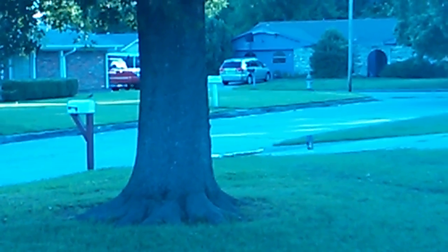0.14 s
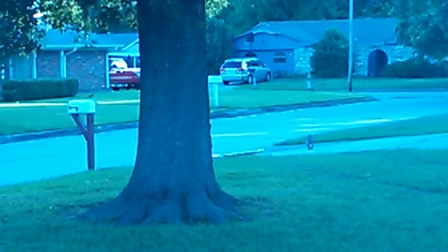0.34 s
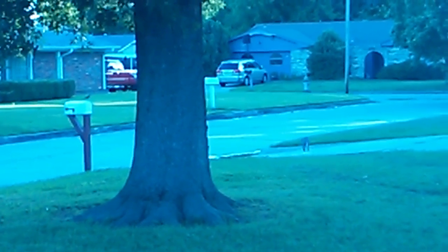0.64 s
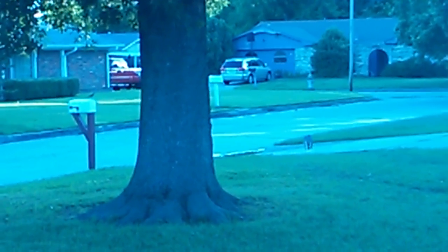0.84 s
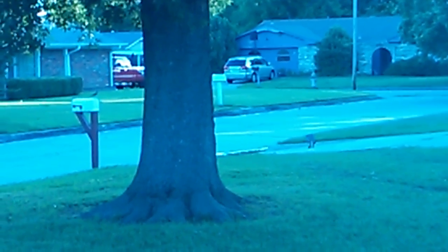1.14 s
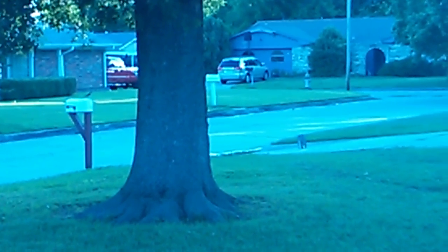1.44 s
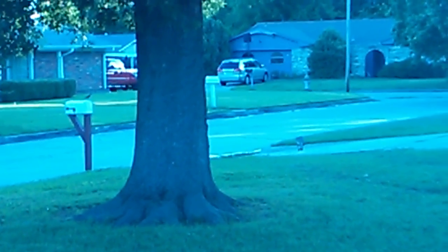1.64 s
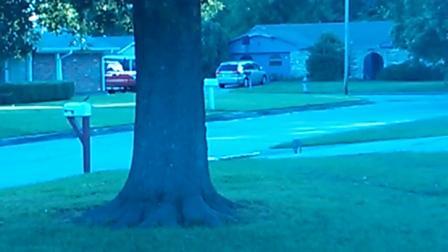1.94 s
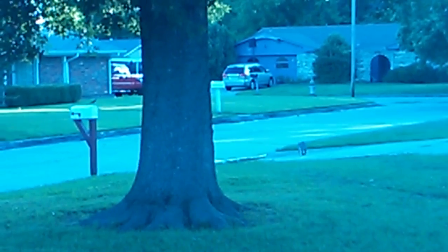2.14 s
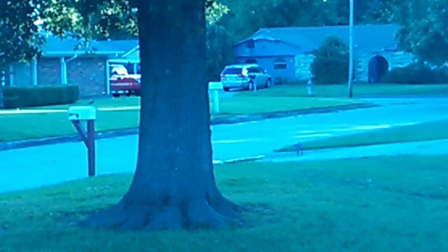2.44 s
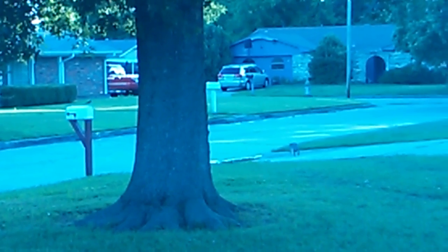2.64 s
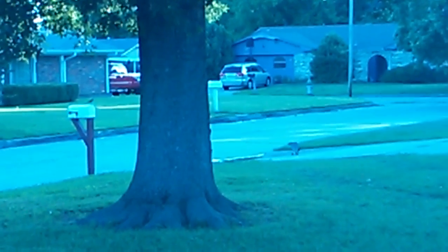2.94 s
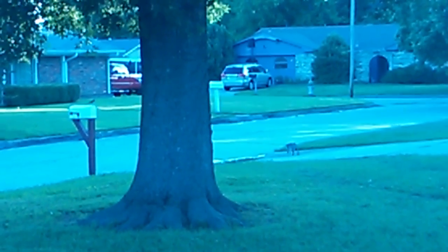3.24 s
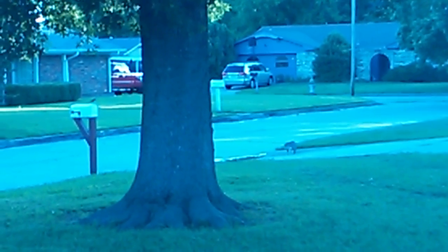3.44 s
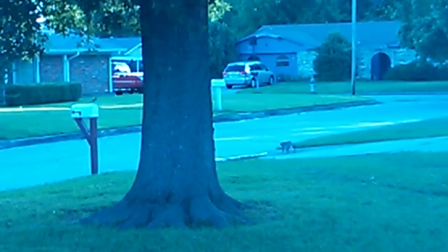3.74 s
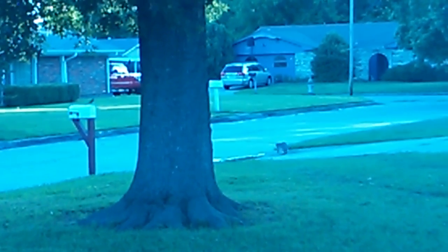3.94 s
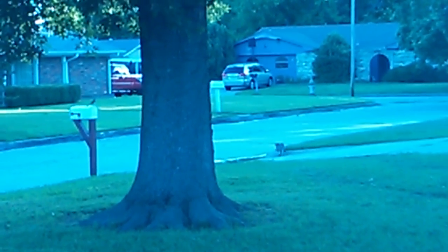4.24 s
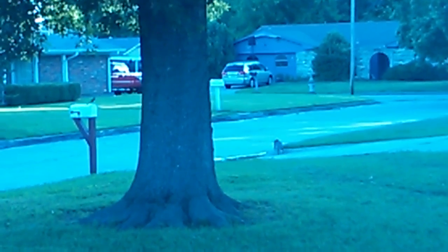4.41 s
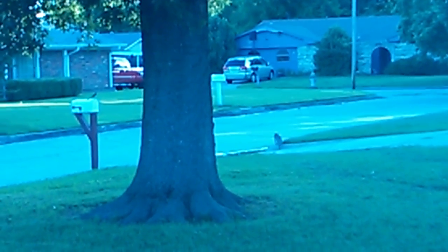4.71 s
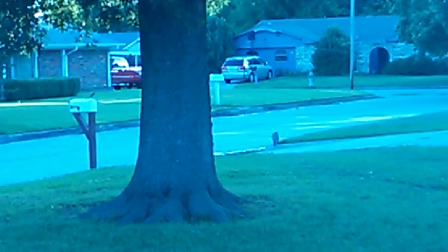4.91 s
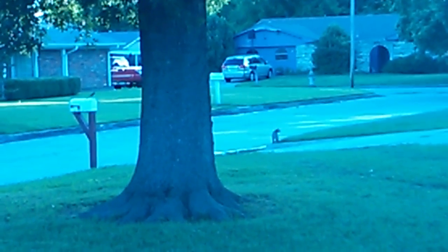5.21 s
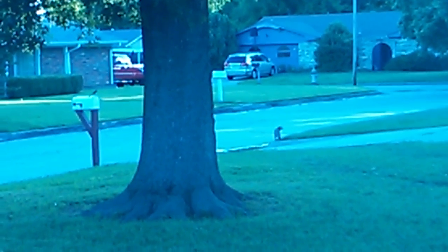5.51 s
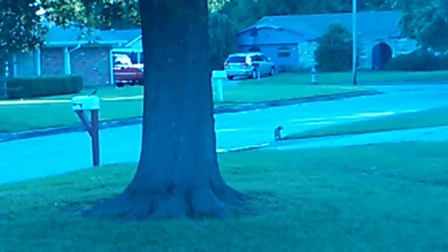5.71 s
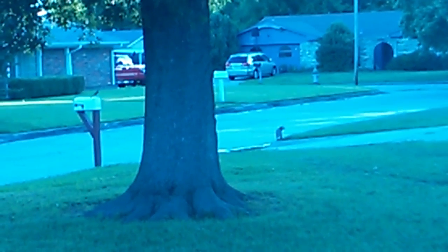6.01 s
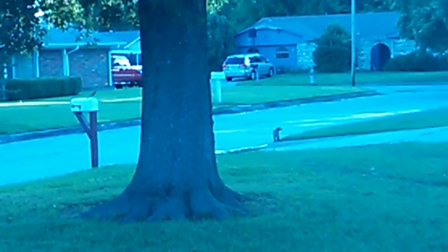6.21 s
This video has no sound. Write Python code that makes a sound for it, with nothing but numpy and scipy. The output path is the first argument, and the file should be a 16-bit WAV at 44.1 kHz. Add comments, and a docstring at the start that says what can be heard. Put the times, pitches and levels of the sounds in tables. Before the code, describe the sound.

On a quiet suburban street, a jay gives four short, harsh calls at uneven gaps, each echoing lightly off the houses. Faint chirps and whistles from farther birds fall between them. After the first call comes a brief dry clatter in the branches and two thin, high bird notes. Distant traffic, a low machine hum and faint insect hiss lie underneath, while soft puffs of air bump the microphone.

```python
"""A quiet suburban street opens on distant traffic, humming machines, insect hiss and faint bird whistles.
Just before 1 s a jay scolds from a tree: two rough voices in its throat fall together in a harsh "chak"
that comes back from the house fronts. Soft puffs of air bump the microphone on and off.
Near 2 s something clatters in the branches, and two thin, high bird calls sound.
The jay scolds three more times while the insects fade and a far bird repeats a low-high phrase."""
import sys
import numpy as np
from scipy import signal
from scipy.fft import rfft, irfft, next_fast_len
from scipy.io import wavfile
from scipy.ndimage import uniform_filter1d, map_coordinates

SR = 44100
rng = np.random.default_rng(int(sys.argv[2]) if len(sys.argv) > 2 else 0)


def to_wav(sig):
    """Store sig (one row per channel, or 1-D mono) as 16-bit WAV at the path in sys.argv[1].

    Samples outside -1..1 are clipped; the rate is SR.
    """
    pcm = np.clip(np.atleast_2d(sig), -1, 1) * 32767
    pcm = np.round(pcm).astype(np.int16)
    wavfile.write(sys.argv[1], SR, pcm.T)  # frames by channels


N = 280379

# A "colour" says how strong a sound is from low to high. Each has: frequency_hz, gain_db
AIR_COLOUR = [(1500, -10), (2400, 4), (3200, -4.5), (4500, 1), (6000, 1.5), (10000, -13), (15000, -6)]  # faint, even hiss
TRAFFIC_COLOUR = [(20, -7.5), (45, -1), (100, 2.5), (200, -9), (310, -5), (420, -12), (600, -17),
                  (780, -26), (930, -17.5), (1120, -28.5), (1320, -23), (1620, -34), (1950, -24.5),
                  (2350, -44.5), (3100, -48)]  # distant rumble
INSECT_COLOUR = [(3500, -17.5), (5000, -16), (6500, -6), (7800, -1.5), (9000, -5), (11000, -13.5),
                 (15000, -18)]  # high insect hiss
TAIL_COLOUR = [(2000, -3.5), (3000, -13), (3700, -0.5), (5000, -5), (6500, -2), (8200, 5), (9800, -1.5),
               (11300, -6.5), (13000, 2)]  # sound lingering in the street
ECHO_COLOUR = [(500, -5.5), (2200, -10), (3150, -13), (3650, -2.5), (5200, -12.5), (6000, -17),
               (6900, -5.5), (8000, -8), (10000, -10), (11300, -25), (15000, -24)]  # what the house fronts send back
CLATTER_COLOUR = [(200, -12), (350, -7), (520, 0), (930, 0.5), (1100, -6.5), (1320, 1), (1620, -13.5),
                  (1950, -5.5), (3500, -16), (5500, -17.5), (7500, -4.5), (9800, -13), (13000, -20.5),
                  (15000, -29)]  # the noise in the branches
RASP_COLOUR = [(1800, -43), (2300, -37), (2600, -23.5), (4500, -0.5), (5900, 5), (7000, 5.5), (8300, 6),
               (9800, -1.5), (11300, 4.5), (12500, -8), (15500, -14)]  # the jay's breath
THROAT_COLOUR = [(1000, -35), (1650, -9), (1950, -2.5), (2600, -1), (2830, -6), (3250, -2.5), (3750, 2.5),
                 (4100, 2), (4420, -3), (4680, 1), (4900, -5), (5150, 7), (5450, -0.5), (6200, 0)]  # how the jay's throat shapes its call

# the traffic's slow rise and fall: time_s, relative_level_db
TRAFFIC_LEVELS = [(0.0, -54), (1.63, -55.5), (2.07, -54.5), (2.48, -57), (4.64, -53.5), (4.94, -56),
                  (5.61, -56), (5.77, -54.5), (6.36, -53)]
# swells of the insect chorus: peak_s, level_db, rise_s, fade_s
INSECT_SWELLS = [(.15, -64, 1.2, 1.0), (2.33, -63.5, 0.68, 0.59), (4.41, -72.5, .025, .12)]
# the strongest puffs of air: centre_s, level_db
STRONG_PUFFS = [(.855, -42.5), (1.391, -41), (1.724, -41), (1.96, -40.5), (2.089, -41), (2.659, -44.5),
                (2.78, -46.5), (3.074, -46), (3.904, -36.5), (4.405, -47), (4.506, -36), (5.594, -42.5),
                (5.76, -41.5)]
# how long the street's tail takes to drop 60 dB: frequency_hz, fade_s
STREET_FADES = [(300, .5), (2000, 0.74), (4000, 0.89), (8000, 0.77), (11300, 0.99), (14000, 0.97)]
# echoes off house fronts: delay_s, relative_level_db, smear_s
HOUSE_ECHOES = [(0.104, -15.5, 0.023), (.19, -23, 0.022), (.218, -27, .008), (.357, -34, 0.002)]

# sliding whistles: start_s, length_s, start_hz, end_hz, level_db
WHISTLES = [(0.113, 0.037, 2160, 2070, -59.5), (.264, .056, 2660, 3204, -57),
            (0.318, 0.056, 2596, 2406, -57), (0.394, 0.079, 2374, 2205, -59.5),
            (0.725, .058, 3520, 2690, -53), (0.766, 0.074, 2590, 2570, -43.5),
            (1.121, 0.17, 2127, 1942, -53.5), (2.274, 0.09, 2495, 2475, -53.5),
            (2.354, 0.1, 3340, 3070, -61.5), (2.438, 0.0524, 3060, 2280, -55),
            (3.673, 0.052, 6000, 5250, -63)]
# one songbird's repeated note: start_s, middle_pitch_hz, level_db
TWEETS = [(1.234, 2118, -48), (1.625, 2642, -46), (1.740, 2632, -42)]
# when the farthest bird sings its phrase: start_s
FAR_PHRASE_STARTS = [3.66, 5.64, 5.82]
# that phrase's two notes: after_start_s, length_s, start_hz, end_hz, level_db
FAR_NOTES = [(0, .055, 2220, 2183, -70), (.072, 0.084, 2760, 2524, -74.5)]
# thin, high bird calls: start_s, length_s, start_hz, end_hz, level_db, roughness (0 to 1)
HIGH_CALLS = [(2.001, 0.14, 8300, 6740, -35, 0.83), (2.252, 0.12, 11260, 11320, -42.5, 0.14)]

# the clatter's brush and clack: start_s, level_db, base_fade_s, brightness_hz
CLATTER_HITS = [(1.938, -47.5, 0.72, 6000), (2.01, -33.5, 0.27, 20000)]
# how much longer than base_fade_s each frequency lasts: frequency_hz, fade_factor
CLATTER_FADE_FACTORS = [(500, 1.37), (1400, 1.43), (4000, 1.36), (6000, 1.36), (7400, 1.3), (10000, 1.6),
                        (14500, 2.1)]

# the jay's calls: start_s, relative_level_db, stretch_factor, upper_voice_db, pitch_factor, echo_db
JAY_CALLS = [(0.778, -30.5, 1, 0.5, 0.95, -2), (2.555, -32.5, 0.95, 2, 0.98, 1),
             (4.662, -31.5, .94, 4.5, 0.95, 3), (6.246, -27.5, 0.95, -1, 1, 4)]
# its two voices, before each call stretches and tunes them: time_s, pitch_hz, relative_level_db
UPPER_VOICE = [(0, 4800, -16), (.005, 4743, -6), (.01, 4960, -3), (.019, 4914, 3), (.026, 4616, -11.5),
               (.033, 4097, -8.5), (.045, 3427, -7.5), (.058, 3046, -24.5)]
LOWER_VOICE = [(0, 3393, -21), (.008, 3657, -9.5), (.02, 3774, -7), (.029, 3435, 2.5), (.033, 3347, -1),
               (.038, 2450, -5.5), (.049, 2100, -9), (.064, 1990, -33)]
# its rasping breath, before the same stretch: time_s, relative_level_db
RASP_LEVELS = [(0, -25), (.006, -11.5), (.016, -13), (.027, -12.5), (.035, -7), (.045, -38), (.064, -35)]


def amp(db):
    """Turn decibels into a number to multiply by."""
    return 10 ** (np.asarray(db) / 20)


def unit(x):
    """Scale x to an average strength (rms) of 1."""
    return x / np.sqrt(np.mean(x ** 2) + 1e-20)


def clock(n):
    """The times of n samples, in seconds."""
    return np.arange(n) / SR


def curve(rows, t):
    """Join a table's rows with straight lines and read each value column at times t."""
    times, *columns = np.transpose(rows)
    return [np.interp(t, times, column) for column in columns]


def along(points, hz):
    """Read a frequency table at hz, giving every octave equal room."""
    frequencies, values = np.transpose(points)
    return np.interp(np.log(hz + 1), np.log(frequencies + 1), values)


def wobble(rate, n):
    """A smooth curve through rate random values a second."""
    return map_coordinates(rng.standard_normal(int(n * rate / SR) + 4), [clock(n) * rate])


def filtered(x, response):
    """Turn each frequency of x up or down by response(hz)."""
    size = next_fast_len(len(x) + 8192)
    return irfft(rfft(x, size) * response(np.fft.rfftfreq(size, 1 / SR)), size)[:len(x)]


def noise(colour, n):
    """Noise of the given colour, at strength 1."""
    return unit(filtered(rng.standard_normal(n), lambda hz: amp(along(colour, hz))))


def phase_of(hz):
    """The angle a wave has turned through as it follows a pitch."""
    return 2 * np.pi * np.cumsum(hz) / SR


def add(track, start_s, sound):
    """Mix a sound into the track."""
    part = track[max(round(start_s * SR), 0):]
    part[:len(sound)] += sound[:len(part)]


def dying(x, fades, scale=1):
    """Each frequency of x drops 60 dB in its own time: its value in fades times scale."""
    hz, times, bands = signal.stft(x, SR, nperseg=256)
    fade_s = scale * along(fades, hz)[:, None]
    return signal.istft(bands * amp(-60 * times / fade_s), SR, nperseg=256)[1][:len(x)]


def patchy(x, depth_db):
    """Moving air lets narrow bands of a far sound swell and fade on their own."""
    bands = signal.stft(x, nperseg=2048)[2]
    swell = uniform_filter1d(rng.standard_normal(bands.shape), size=4, axis=0)  # smooth across bands
    swell = uniform_filter1d(swell, size=6, axis=1)  # and over time
    return unit(signal.istft(bands * amp(depth_db * unit(swell)), nperseg=2048)[1][:len(x)])


def hiss(level_db=-74):
    """A faint, even hiss lies under everything."""
    return amp(level_db) * noise(AIR_COLOUR, N)


def traffic(boost_db=4):
    """Distant traffic rumbles unevenly through moving air."""
    level_db = boost_db + curve(TRAFFIC_LEVELS, clock(N))[0] + wobble(10, N)
    return amp(level_db) * patchy(noise(TRAFFIC_COLOUR, N), depth_db=3.0)


def insects(rest_db=-83):
    """Insects in the trees blend into a hiss that swells and fades over a resting level."""
    t = clock(N)
    swells = [amp(db) * np.exp(np.minimum((t - peak_s) / rise_s, (peak_s - t) / fade_s))
              for peak_s, db, rise_s, fade_s in INSECT_SWELLS]
    loudness = np.sqrt(amp(rest_db) ** 2 + np.sum(np.square(swells), axis=0))
    return loudness * amp(wobble(12, N)) * noise(INSECT_COLOUR, N)


def air_conditioner(pitch_hz=236, level_db=-55.5):
    """An air conditioner hums one nearly steady tone."""
    return amp(level_db + wobble(4.8, N)) * np.sin(phase_of(pitch_hz + 0.53 * wobble(2.866, N)))


def engine(pitch_hz=150, start_db=-49.5, fade_db_per_s=4, rest_db=-63.5, octave_db=-61.5):
    """A far engine surges once and fades as it moves away; a tone an octave up wavers."""
    t = clock(N)
    phase = phase_of(pitch_hz + 2 * wobble(9, N))
    surge_db = 6.5 * np.exp(-((t - 0.4) / 0.2) ** 2)  # peaks at 0.4 s
    level_db = np.maximum(start_db - fade_db_per_s * t, rest_db) + surge_db
    hum = amp(level_db + wobble(11, N)) * np.sin(phase)
    octave = amp(octave_db + 3.5 * wobble(9, N)) * np.sin(2 * phase)
    return hum + octave


def puffs(length_s=0.0903, low_hz=40, high_hz=125, weak_gap_s=.45, weak_db=-52):
    """Small swirls of air thump on the microphone: strong ones among weaker, random ones."""
    out = np.zeros(N)
    swell = signal.windows.hann(int(length_s * SR))
    weak_puffs = [(weak_gap_s * (k + rng.random()), rng.normal(weak_db, 0.5)) for k in range(14)]
    for centre_s, db in STRONG_PUFFS + weak_puffs:
        swirl = filtered(rng.standard_normal(len(swell)),
                         lambda hz: hz ** 2 / (hz ** 2 + low_hz ** 2) / (1 + (hz / high_hz) ** 10))
        add(out, centre_s - length_s / 2, amp(db) * np.sqrt(np.mean(swell ** 2)) * unit(swell * swirl))
    return out


def outdoors(x, leaves_db, street_db, houses_db, leaves_fade_s=0.23):
    """A sound arrives directly, scatters off branches, lingers in the street and echoes off houses."""
    t = clock(SR)
    tail = dying(noise(TAIL_COLOUR, SR), STREET_FADES)
    leaves = rng.standard_normal(SR) * amp(-60 * t / leaves_fade_s) * (t > .002)
    echoes = amp(street_db) * unit(tail) + amp(leaves_db) * unit(leaves)
    for delay_s, db, smear_s in HOUSE_ECHOES:
        bounce = (t > delay_s) * np.exp(-np.abs(t - delay_s) / smear_s)
        echoes += amp(houses_db + db) * unit(bounce * noise(ECHO_COLOUR, SR))
    return np.pad(x, (0, SR - 1)) + signal.fftconvolve(x, echoes / np.sqrt(SR))


def bird_tone(hz, rough, overtone_db):
    """A tone with a quiver in its pitch, plus a softer one an octave up."""
    phase = phase_of(hz * (1 + 0.05 * rough * wobble(452, len(hz))))
    return np.sin(phase) + amp(overtone_db) * np.sin(2 * phase)


def whistle(length_s, start_hz, end_hz, db):
    """A note swells, slides evenly and fades; the wider it slides, the more it quivers."""
    hz = np.geomspace(start_hz, end_hz, int(length_s * SR))
    rough = 0.16 + 0.55 * abs(np.log2(end_hz / start_hz))
    return amp(db) * signal.windows.tukey(len(hz), .5) * bird_tone(hz, rough, overtone_db=-36)


def tweet(middle_hz, db, lead_s=.042, hold_s=0.0276, drop_s=0.0426, step_s=0.0088):
    """A soft lead-in steps down onto a loud held note, then drops away."""
    corners_s = np.cumsum([0, lead_s - step_s, step_s, hold_s, step_s, drop_s - step_s])
    t = clock(int(corners_s[-1] * SR))
    hz = middle_hz * np.interp(t, corners_s, [1.15, 1.07, 1, 1, 1 / 1.07, .84])
    level_db = db + np.interp(t, corners_s, [-10.5, -10.5, 0, 0, -12, -12])
    return amp(level_db) * signal.windows.tukey(len(t), .35) * bird_tone(hz, rough=0.32, overtone_db=-32)


def high_call(length_s, start_hz, end_hz, db, rough):
    """A thin call starts harsh, then clears and fades as its pitch settles."""
    rise_s, settle_s, clear_s, fade_db_per_s = 0.017, .03, .08, 126
    t = clock(int(length_s * SR))
    hz = end_hz + (start_hz - end_hz) * np.exp(-t / settle_s)
    loudness = amp(db - fade_db_per_s * t) * np.minimum(t / rise_s, 1) * signal.windows.tukey(len(t), .1)
    return loudness * bird_tone(hz, rough * np.exp(-t / clear_s), overtone_db=-18)


def songbirds():
    """Farther birds sing, blurred by the trees."""
    out = np.zeros(N)
    notes = [(s, whistle(*note)) for s, *note in WHISTLES]
    notes += [(s, tweet(*note)) for s, *note in TWEETS]
    notes += [(s + after_s, whistle(*note)) for s in FAR_PHRASE_STARTS for after_s, *note in FAR_NOTES]
    for start_s, note in notes:
        add(out, start_s, outdoors(note, leaves_db=-0.5, street_db=-14, houses_db=-6.5))
    for start_s, *call in HIGH_CALLS:
        add(out, start_s, outdoors(high_call(*call), leaves_db=1.5, street_db=-12, houses_db=-8))
    return out


def clatter():
    """In the branches: a soft, dull brush, then a sharp, dry clack that dies quickly."""
    out = np.zeros(N)
    for start_s, db, base_fade_s, bright_hz in CLATTER_HITS:
        burst = filtered(noise(CLATTER_COLOUR, SR // 2), lambda hz: 1 / np.hypot(1, hz / bright_hz))
        add(out, start_s, amp(db) * dying(burst, CLATTER_FADE_FACTORS, base_fade_s))
    return out


def jay_voice(voice, t, pitch_factor, jitter):
    """One side of the jay's voice box shakes unevenly; gives its loudness and phase."""
    hz, db = curve(voice, t)
    return amp(db), phase_of(pitch_factor * hz * (1 + jitter * wobble(1300, len(t))))


def chak(stretch, upper_db, pitch_factor, sum_tone_db=-16, flutter_db=2.5):
    """Two rough voices fall together while air rasps through; the throat shapes the mix."""
    t = clock(SR // 12) / stretch
    upper, upper_phase = jay_voice(UPPER_VOICE, t, pitch_factor, jitter=0.058)
    lower, lower_phase = jay_voice(LOWER_VOICE, t, pitch_factor, jitter=0.1203)
    upper *= amp(upper_db)
    voices = upper * np.sin(upper_phase) + lower * np.sin(lower_phase)
    # the voices push on each other, making a third tone at the sum of their pitches
    voices += amp(sum_tone_db) * np.sqrt(upper * lower) * np.sin(upper_phase + lower_phase)
    rasp = amp(curve(RASP_LEVELS, t)[0]) * noise(RASP_COLOUR, len(t))
    flutter = amp(flutter_db * wobble(650, len(t)))
    call = (voices + rasp) * flutter * signal.windows.tukey(len(t), .03)
    return filtered(call, lambda hz: amp(along(THROAT_COLOUR, hz)))


def jay(lawn_db=-5, lawn_delay_s=.00306, grass_cutoff_hz=6500):
    """Each chak echoes round the street and also bounces off the lawn, dulled by the grass."""
    out = np.zeros(N)
    for start_s, db, stretch, upper_db, pitch_factor, echo_db in JAY_CALLS:
        call = amp(db - 1) * chak(stretch, upper_db, pitch_factor)
        add(out, start_s, outdoors(call, leaves_db=-6, street_db=-4, houses_db=echo_db))
        bounce = filtered(call, lambda hz: 1 / (1 + (hz / grass_cutoff_hz) ** 4))
        add(out, start_s + lawn_delay_s, amp(lawn_db) * bounce)
    return out


def scene():
    """All the sounds meet at one microphone."""
    events = jay() + songbirds() + clatter() + puffs()
    background = air_conditioner() + engine() + traffic() + insects() + hiss()
    return (events + background)[None]


def record(dry):
    """Cut away the very highest treble."""
    top_hz = 15750
    return filtered(dry[0], lambda hz: hz < top_hz)[None]


dry = scene()
out = record(dry)
to_wav(out)
```